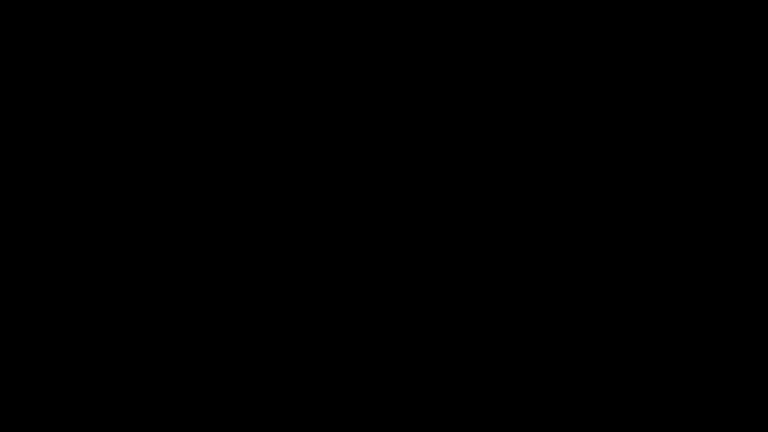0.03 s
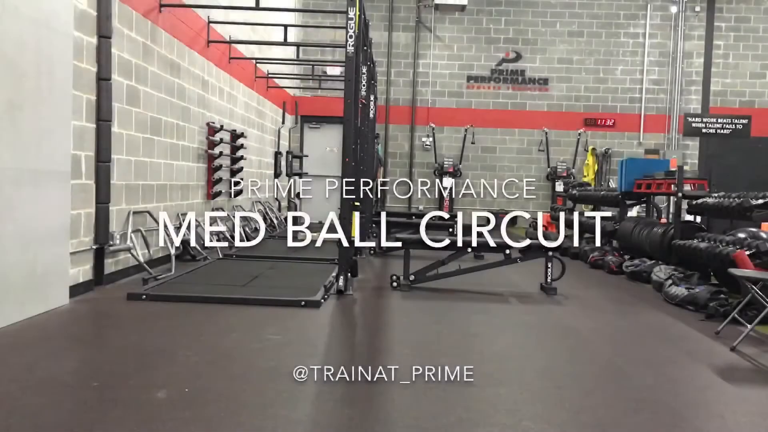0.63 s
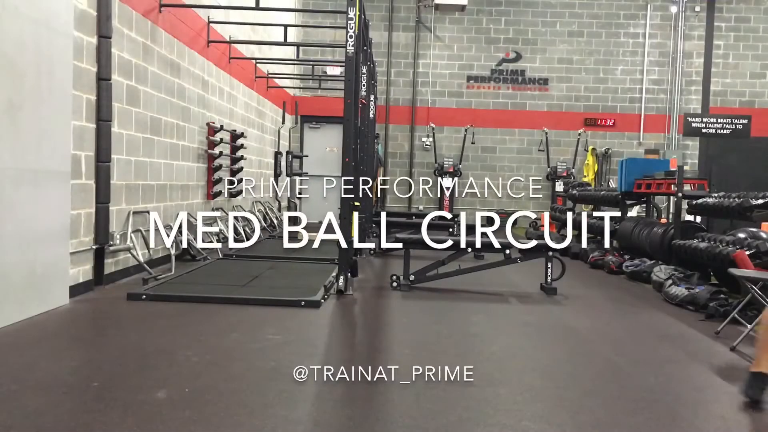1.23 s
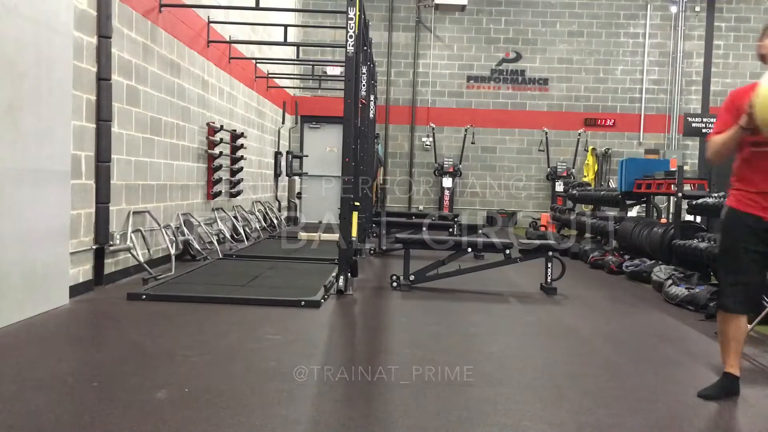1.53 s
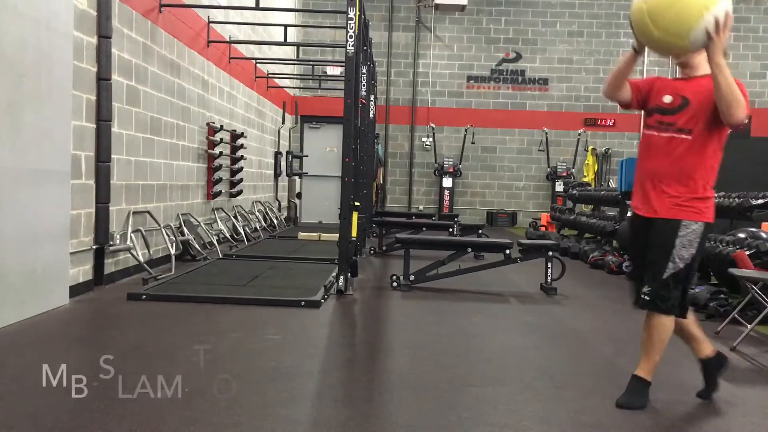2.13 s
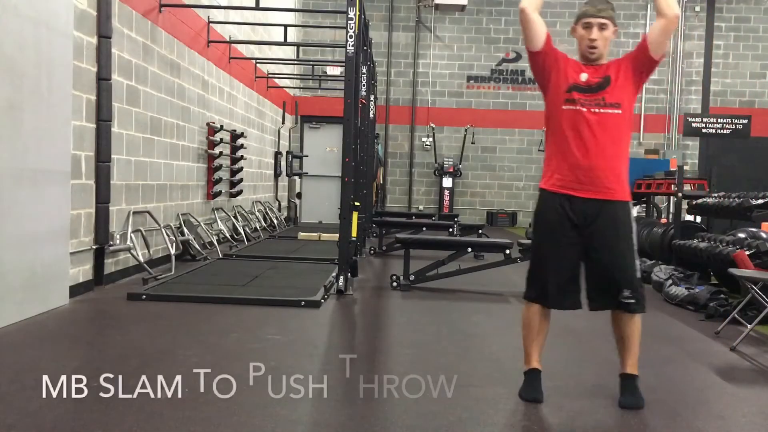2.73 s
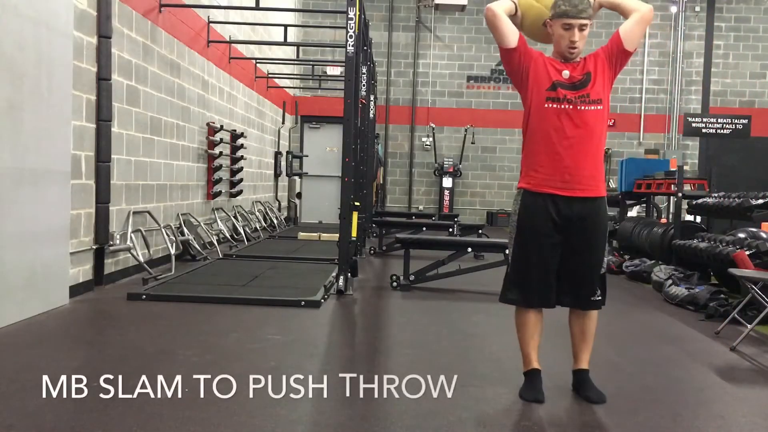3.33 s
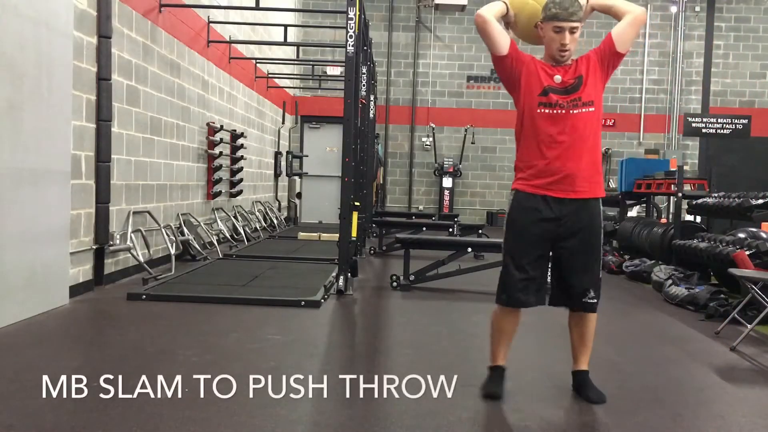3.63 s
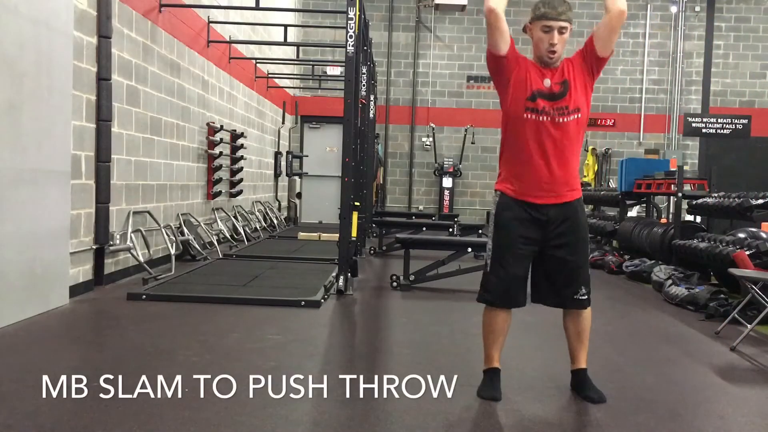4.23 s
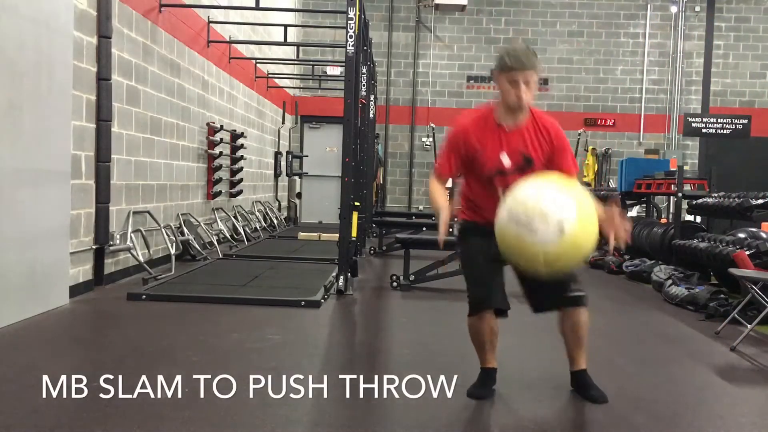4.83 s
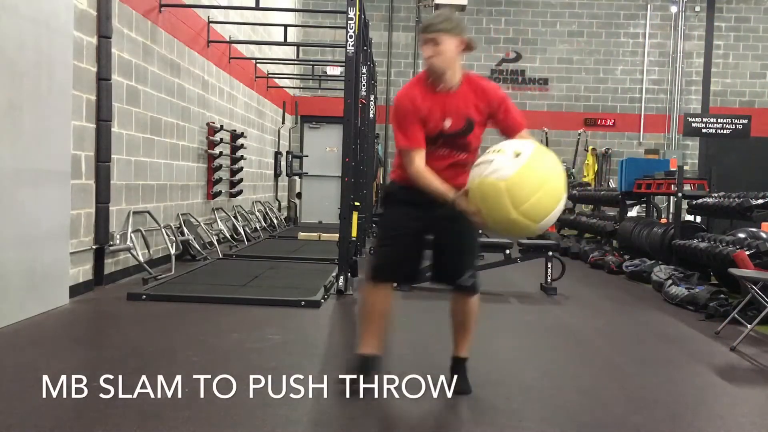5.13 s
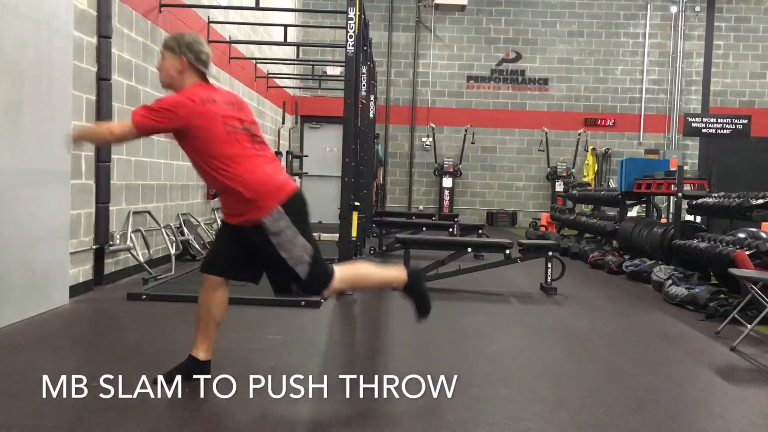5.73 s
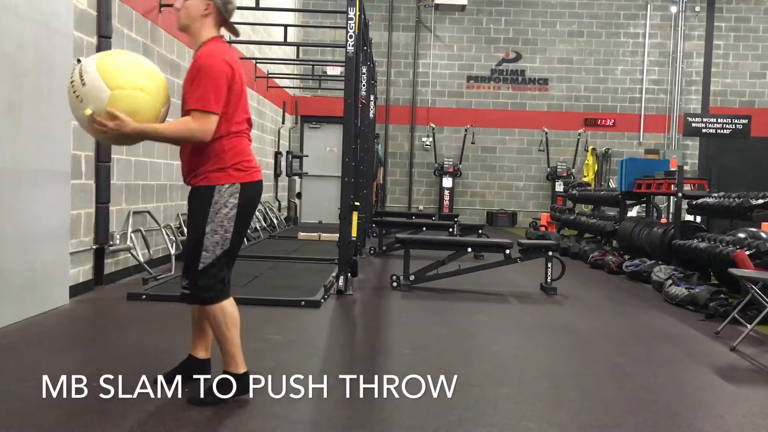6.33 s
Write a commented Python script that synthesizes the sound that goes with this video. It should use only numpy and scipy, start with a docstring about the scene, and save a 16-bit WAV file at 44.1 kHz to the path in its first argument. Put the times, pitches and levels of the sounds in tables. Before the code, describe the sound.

Ventilation hums steadily in a large gym, with nothing else but a faint swish of clothing for over four seconds. Then a heavy, soft medicine ball is slammed on the rubber floor with a sharp slap and a deep thump. About a second later it thuds against a wall and is caught with a light pat. Both blows echo through the hall, picked up by a single microphone in the room.

```python
"""In a block-walled gym, a heavy, soft medicine ball is slammed on the rubber floor, caught, thrown at
the wall and caught again. In each blow, panels of the cover slap down and expel trapped air, while the
filling squashes and excites damped modes: a deep thump. The hall reverberates for about two seconds and
its bass rolls back in waves. Clothes and socks swish by friction, hands pat the ball and feet thud.
Ventilation hums underneath; the sound drops out briefly at the start and near two seconds."""
import sys
import numpy as np
from scipy import signal
from scipy.fft import rfft, irfft, next_fast_len
from scipy.io import wavfile

SR = 44100
rng = np.random.default_rng(int(sys.argv[2]) if len(sys.argv) > 2 else 0)


def store_pcm(level_fs):
    """Save levels as 16-bit WAV."""
    pcm = np.round(np.clip(level_fs, -1, 1) * 32767).astype(np.int16)
    wavfile.write(sys.argv[1], SR, np.atleast_2d(pcm).T)


N = 281358
T = np.arange(N) / SR
AGE = T[:2 * SR]   # seconds since a blow

# The floor blow, then the wall blow. Each row: start in seconds, pop level in dB, pop pitch in Hz,
# crackle level in dB, gap between panels in seconds, crackle loss per panel in dB, spring-back level in
# dB, crinkle delay in seconds, scatter level in dB, scatter rise in seconds, hall level in dB, hall tilt
# in dB per octave, first bass echo in dB, bass round trip in seconds.
IMPACTS = [(4.6556, 5, 1330, -2, .0037, 1, -10.5, 0.013, -22.5, 0.0022, -21.5, -0.1, -22, 0.1),
           (5.7392, -1, 1520, -2.5, .0019, 4.5, -2, .0268, -10, .015, -18.5, 0.25, -10.5, .12)]
# Modes of the ball on floor and wall. Each row: frequency in Hz, level in dB, 60 dB decay time in seconds.
FLOOR_THUMP_MODES = [(47.1, -10.5, 0.54), (80.5, -7.5, 0.15), (138, -1, 0.11), (340, -4, 0.049),
                     (414, -10, 0.084), (633, 1, 0.037), (1210, -19, 0.072), (1650, -28, 0.05)]
WALL_THUMP_MODES = [(51.5, 1, 0.21), (76.5, -7.5, 0.17), (139, 3, 0.11), (161.6, -5.5, 0.1),
                    (238, -14.5, 0.17), (559, -9, 0.091), (668, -5.5, 0.046), (1091, -14.5, 0.13),
                    (1570, -24, 0.2), (2495, -31, 0.22)]
# Resonances that each blow sends into the hall. Each row: centre in Hz, width in Hz, gain in dB.
FLOOR_RESONANCES = [(155, 32, 3.5), (347, 70, -5.5), (444, 116, 6.5), (685, 110, 6), (952, 78, 5.5),
                    (1250, 180, 4.5), (1660, 160, 1.5), (2050, 140, 3), (9400, 1700, 1.5)]
WALL_RESONANCES = [(80, 30, 8), (303, 70, -1.5), (474, 160, -4.5), (567, 55, 2.5), (793, 80, -5.5),
                   (1080, 61, 0.5), (1560, 180, -0.5), (2140, 130, -1.5), (2470, 140, 4),
                   (9200, 5600, -8.5), (13400, 2200, -3)]
# Spectra of the cover's crackle and of the scatter from nearby floor, wall and racks.
# Each row: frequency in Hz, relative spectral density in dB.
CRACKLE_SPECTRUM = [(200, -7), (900, 10.5), (2000, 3.5), (4000, 4.5), (6300, 3.5), (9000, 1.5), (16000, -3)]
SCATTER_SPECTRUM = [(100, -10), (300, -0.5), (600, -2), (1200, -0.5), (2500, -3.5), (4200, -8.5),
                    (6200, -9.5), (8000, -10), (11000, -13.5), (15500, -18)]
# The diffuse tail. Each row: frequency in Hz, relative density in dB, reverberation time in seconds.
HALL_TAIL = [(30, -17, 3.7), (64.3, -5, 0.45), (131.5, 14.5, 1.92), (280, -3.5, 2.32), (523, -1, 2.34),
             (1050, -3, 2.4), (2370, -5.5, 1.68), (4180, -12, 1.28), (6250, -12, 0.86), (8000, -10, 0.59),
             (11200, -9.5, 0.35), (15500, -31, 0.51)]
# Strokes of clothes and socks. Each row: crest time in seconds, level in dB, rise in seconds.
CLOTH_SWISHES = [(.875, -51, 0.021), (1.04, -64, .08), (4.57, -58, .06), (4.625, -47.5, 0.0099),
                 (5.575, -49.5, .034), (5.603, -49, 0.013), (5.701, -57, .028)]
# Hands landing on the ball. Each row: crest time in seconds, level in dB.
HAND_PATS = [(5.154, -45.5), (5.967, -29.5), (5.9759, -25.5)]
# Soft low thuds: feet, the ball in the arms, and a swell of the slam's returning bass.
# Each row: crest time in seconds, peak level in dB, frequency in Hz, length in seconds.
SOFT_THUDS = [(4.897, -15, 65, 0.075), (4.995, -21.5, 64, 0.034), (5.417, -30.5, 69, .038),
              (5.988, -20, 122, 0.042)]
# The ventilation's air noise. Each row: frequency in Hz, relative spectral density in dB.
AIR_SPECTRUM = [(25, -15), (45, -10), (70, -1), (92, 0.5), (122, 1), (150, -11), (210, -10), (280, -17.5),
                (600, -18.5), (1100, -21.5), (2600, -33.5), (4000, -40), (8000, -45.5), (15500, -50)]
# Duct and room resonances in that noise. Each row: centre in Hz, width in Hz, gain in dB.
DUCT_RESONANCES = [(171.7, 10, -5), (188.5, 54, 5.5), (538, 48, 3.5), (745, 83, -6), (1640, 510, -2.5),
                   (2380, 1360, 3.5)]
# Fan and motor tones. Each row: frequency in Hz, level in dB, level waver in dB.
FAN_TONES = [(56.4, -34.5, 1.5), (96.5, -52, -2), (116.1, -48, 3), (375.5, -61, 2.9), (448, -61.5, 1.5),
             (569, -59.5, 2.5), (744, -62, 2.5)]
# Peaks and dips of the microphone's port. Each row: centre in Hz, width in Hz, gain in dB.
PORT_RESONANCES = [(4940, 290, -6), (5930, 3900, 2), (7650, 1380, -4.5), (9550, 820, 1.5),
                   (10500, 1030, -4.5), (13100, 3400, 3)]
# Moments of silence. Each row: start in seconds, end in seconds.
DROPOUTS = [(0, .119), (2.031, 2.0477)]


def blows(first_echo_s=.0015):
    """An impact in a room is heard as direct sound, then early reflections, then reverberation."""
    out = np.zeros(N)
    surfaces = [(FLOOR_THUMP_MODES, FLOOR_RESONANCES), (WALL_THUMP_MODES, WALL_RESONANCES)]
    for impact, (modes, resonances) in zip(IMPACTS, surfaces):
        s, *cover_settings, scatter_db, scatter_rise_s, hall_db, tilt_db, roll_db, trip_s = impact
        add(out, s, cover(*cover_settings))
        add(out, s, thump(modes) + from_db(roll_db) * bass_roll(trip_s))
        early = from_db(scatter_db) * scatter(resonances, scatter_rise_s)
        tail = from_db(hall_db) * hall(resonances, tilt_db)
        add(out, s + first_echo_s, early + tail)
    return out


def cover(pop_db, pop_hz, crackle_db, gap_s, loss_db, spring_db, crinkle_s):
    """Deformation radiates transients: three panels slap down, the cover springs back and crinkles."""
    out = np.zeros(N)
    pop_loss_db, contact_s = 6, .022   # each panel traps less air than the one before
    for k in range(3):
        add(out, k * gap_s, slap(pop_db - k * pop_loss_db, pop_hz, crackle_db - k * loss_db))
    add(out, contact_s, slap(pop_db=spring_db - 11, pop_hz=pop_hz, crackle_db=spring_db))
    add(out, crinkle_s, slap(pop_db=-10, pop_hz=pop_hz, crackle_db=-14.5, t60=.033))
    return out


def slap(pop_db, pop_hz, crackle_db, t60=.0049, pop_cycles=5, rise_s=.00006):
    """Air trapped under a panel escapes as a damped oscillation, while the vinyl crackles."""
    age = AGE[:SR // 10]
    pop = np.sin(2 * np.pi * pop_hz * age) * strike(age, rise_s, pop_cycles / pop_hz)
    crackle = coloured(rng.standard_normal(len(age)) * strike(age, rise_s, t60), CRACKLE_SPECTRUM)
    return from_db(pop_db) * pop + from_db(crackle_db) * crackle


def thump(modes, squash_s=.0074):
    """Damped modes superpose; the filling yields gradually, so they swell rather than click."""
    return -sum(from_db(db) * strike(AGE, squash_s, t60) * np.sin(2 * np.pi * hz * AGE)
                for hz, db, t60 in modes)


def scatter(resonances, rise_s, t60=.23, grain_db=3):
    """Scattering from surfaces near the blow returns uneven early reflections."""
    grains = rms_one(reflections(resonances) * from_db(grain_db * drift(2500)[:len(AGE)]))
    return coloured(grains * strike(AGE, rise_s, t60), SCATTER_SPECTRUM)


def hall(resonances, tilt_db, build_s=.006):
    """A diffuse field decays exponentially in each third-octave band; air absorbs the treble first."""
    edges = np.geomspace(25, 18000, 30)
    centres = np.sqrt(edges[1:] * edges[:-1])
    gains = from_db(at_hz(HALL_TAIL, centres) + tilt_db * np.log2(centres))
    gains /= np.sqrt(np.sum(gains ** 2 * np.diff(edges)) / (SR / 2))   # unit power gain
    echoes = [reflections(resonances), reflections(resonances)]   # neighbouring bands are uncorrelated
    out = 0
    for k, hz in enumerate(centres):
        bandpass = signal.butter(3, edges[k:k + 2], "band", fs=SR, output="sos")
        band = signal.sosfilt(bandpass, echoes[k % 2])
        out += gains[k] * band * strike(AGE, build_s, t60=at_hz(HALL_TAIL, hz, column=2))
    return out


def reflections(resonances, ripple_db=1.5, spacing_hz=35):
    """Countless echoes sum to noise with the blow's resonances, rippled by interference of its slaps."""
    knots = np.arange(0, SR, spacing_hz)
    ripple = ripple_db * rng.standard_normal(len(knots))
    return noise(lambda hz: from_db(bumps_db(resonances, hz) + np.interp(hz, knots, ripple)), len(AGE))


def bass_roll(trip_s, hz=51.97, loss_db=4.5, length_s=.053, spread_s=.03, thump_crest_s=.016):
    """Repeated reflection returns the bass once per round trip of the hall, weaker and longer each time."""
    waves = 0
    for k in range(6):
        arrival_s = thump_crest_s + (k + 1) * trip_s
        waves += from_db(-k * loss_db) * swell(AGE - arrival_s, length_s + k * spread_s)
    return waves * np.sin(2 * np.pi * (hz * AGE + rng.random()))


def thuds():
    """Slow pulses hold only low frequencies: feet, the ball in the arms, the slam's returning bass."""
    return sum(from_db(db) * swell(T - s, length_s) * np.cos(2 * np.pi * hz * (T - s))
               for s, db, hz, length_s in SOFT_THUDS)


def athlete():
    """Friction of cloth, and of hands on the ball, radiates bright noise."""
    cloth = sum(from_db(db) * brush(s, 12000, rise_s, t60=6.7 * rise_s)   # slow strokes fade slowly
                for s, db, rise_s in CLOTH_SWISHES)
    hands = sum(from_db(db) * pat(s) for s, db in HAND_PATS)
    return cloth + hands


def pat(s, bright_hz=11000, palm_hz=2500, palm_db=-1, rise_s=.0022, t60=.026):
    """Brief contact has a broad spectrum: a bright pat together with the palm's duller clap."""
    return brush(s, bright_hz, rise_s, t60) + from_db(palm_db) * brush(s, palm_hz, rise_s, t60)


def brush(s, centre_hz, rise_s, t60, grain_db=3, room_db=-21, room_t60=.51):
    """Friction makes a grainy hiss that crests at time s and leaves faint reverberation."""
    out, age = np.zeros(N), AGE[:SR] - .5   # half a second on each side of the crest
    hiss = noise(lambda hz: 1 / (1 + np.log2((hz + 1) / centre_hz) ** 2), size=SR)
    stroke = np.exp(-(np.minimum(age, 0) / rise_s) ** 2) * from_db(-60 * np.maximum(age, 0) / t60)
    grains = from_db(grain_db * drift(600)[:SR])
    room = from_db(room_db) * strike(age, rise_s, room_t60)
    add(out, s + age[0], hiss * (stroke * grains + room))
    return out


def ventilation(air_db=-36, speed_waver=.00887, dip_s=.58, dip_db=-6, dip_width_s=.27):
    """Duct resonances shape flow noise; fan and motor tones follow their speed. The level dips once."""
    air = noise(lambda hz: from_db(at_hz(AIR_SPECTRUM, hz) + bumps_db(DUCT_RESONANCES, hz)))
    hum = 0
    for hz, db, waver_db in FAN_TONES:
        turns = np.cumsum(hz * (1 + speed_waver * drift(25))) / SR + rng.random()
        hum += np.sqrt(2) * from_db(db + waver_db * drift(2.84)) * np.sin(2 * np.pi * turns)
    dip = from_db(dip_db * np.exp(-((T - dip_s) / dip_width_s) ** 2))
    return dip * (from_db(air_db) * air + hum)


def from_db(db):
    """Amplitude ratio of a level in decibels."""
    return 10 ** (np.asarray(db) / 20)


def rms_one(x):
    """Normalisation to unit power."""
    return x / np.sqrt(np.mean(x ** 2) + 1e-20)


def at_hz(points, hz, column=1):
    """Interpolation of a table column on a log-frequency axis."""
    table = np.array(points)
    return np.interp(np.log(np.maximum(hz, 1)), np.log(table[:, 0]), table[:, column])


def bumps_db(resonances, hz):
    """Bell-shaped resonance peaks and dips add in decibels."""
    return sum(db / (1 + (2 * (hz - centre) / width) ** 2) for centre, width, db in resonances)


def coloured(x, spectrum, size=4096):
    """Minimum-phase filtering imposes a spectrum causally, at unit power gain."""
    gain = rms_one(from_db(at_hz(spectrum, np.fft.rfftfreq(size, 1 / SR))))
    causal_fold = 1 + np.sign(size // 2 - np.arange(size))
    cepstrum = irfft(np.log(gain)) * causal_fold
    cepstrum[0] /= 2
    impulse_response = irfft(np.exp(rfft(cepstrum)))
    return signal.fftconvolve(x, impulse_response)[:len(x)]


def noise(gain_of_hz, size=N):
    """Spectral weighting turns white noise into coloured noise of unit power."""
    padded = next_fast_len(size)
    spectrum = rfft(rng.standard_normal(padded)) * gain_of_hz(np.fft.rfftfreq(padded, 1 / SR))
    return rms_one(irfft(spectrum, padded)[:size])


def drift(rate_hz):
    """Random fluctuation: straight lines between draws of unit spread."""
    knots = np.arange(0, T[-1] + 1, 1 / rate_hz)
    return np.interp(T, knots, rng.standard_normal(len(knots)))


def strike(age, rise_s, t60):
    """Exponential build-up from age zero, with damping of 60 dB in t60 seconds."""
    age = np.maximum(age, 0)
    return (1 - np.exp(-age / rise_s)) * from_db(np.maximum(-60 * age / t60, -200))


def swell(age, length_s):
    """A bell-shaped envelope that crests at age zero."""
    return np.exp(-2 * (2 * age / length_s) ** 2)


def add(out, s, sound):
    """Superposition of a sound from time s on."""
    at = round(s * SR)
    out[at:at + len(sound)] += sound[:N - at]


def scene():
    """The pressures of blows, thuds, athlete and ventilation add at one microphone."""
    return (blows() + thuds() + athlete() + ventilation())[None]


def record(dry, ceiling=.93, cutoff_hz=16000):
    """Port resonances colour the treble and saturation rounds the peaks; dropouts and a low-pass follow."""
    size = next_fast_len(N + SR // 10)
    port_gain = from_db(bumps_db(PORT_RESONANCES, np.fft.rfftfreq(size, 1 / SR)))
    heard = irfft(rfft(dry, size) * port_gain, size)[:, :N]
    rounded = heard / (1 + (heard / ceiling) ** 8) ** (1 / 8)
    live = np.all([(T < start) | (T > end) for start, end in DROPOUTS], axis=0)
    lowpass = signal.ellip(10, .1, 80, cutoff_hz, fs=SR, output="sos")
    return signal.sosfilt(lowpass, rounded * live)


dry = scene()
out = record(dry)
store_pcm(out)
```